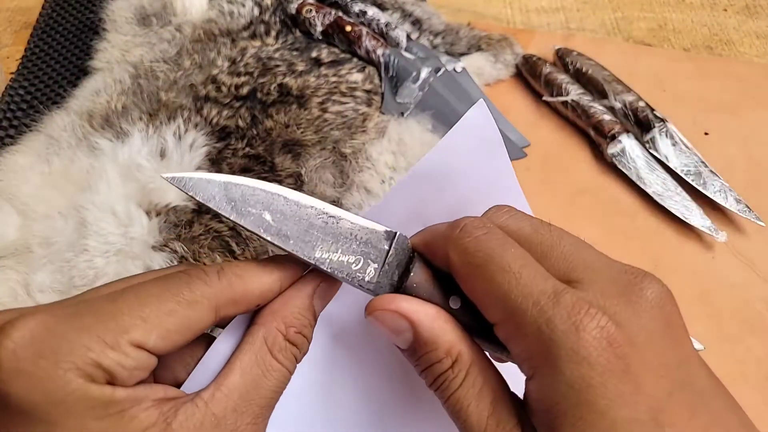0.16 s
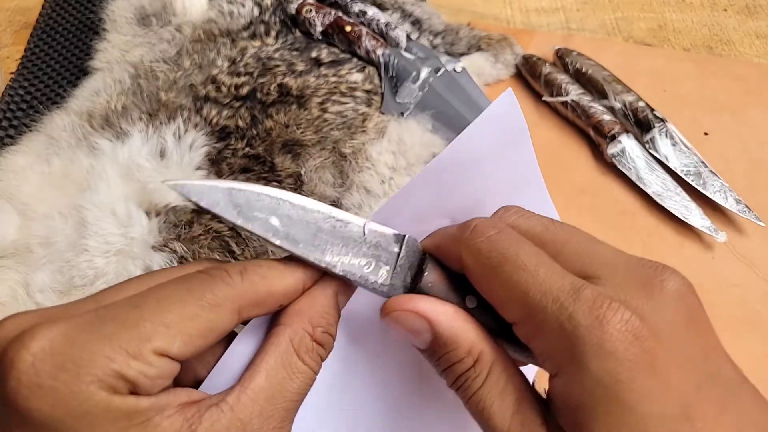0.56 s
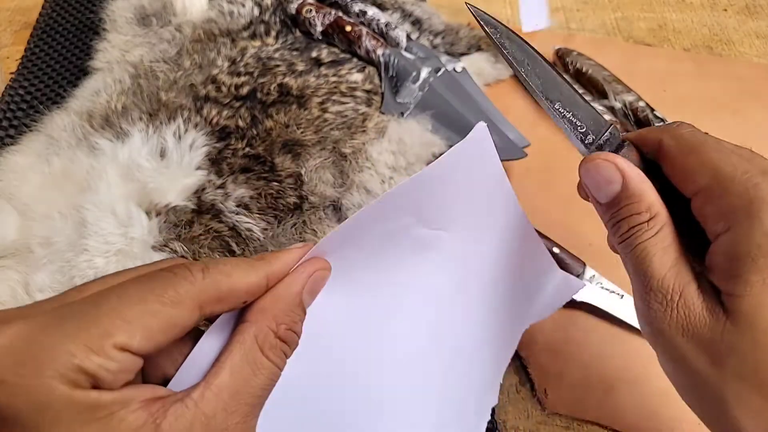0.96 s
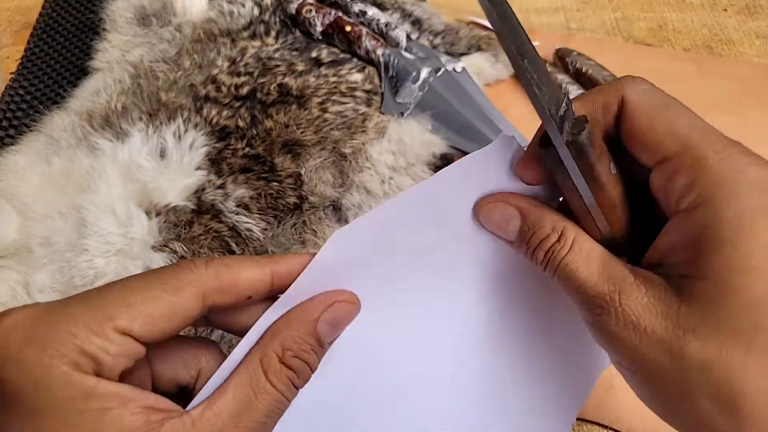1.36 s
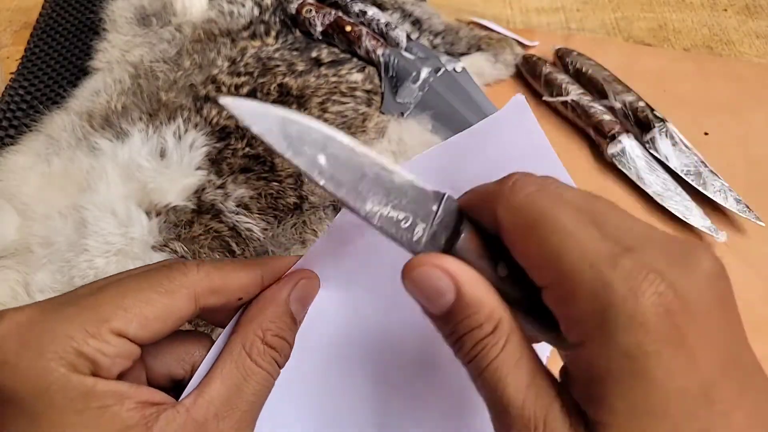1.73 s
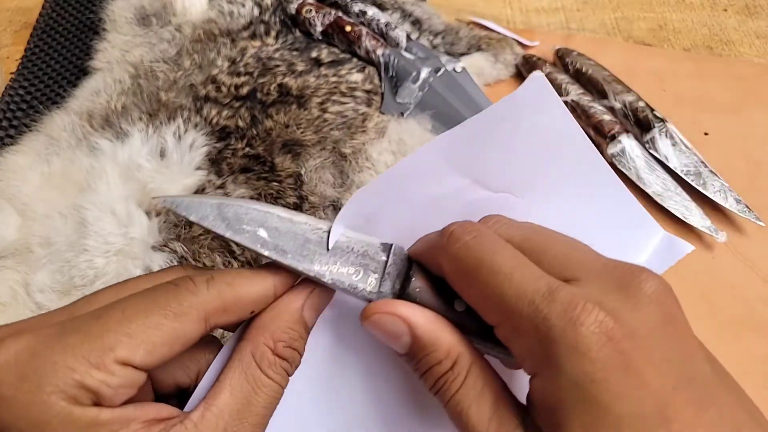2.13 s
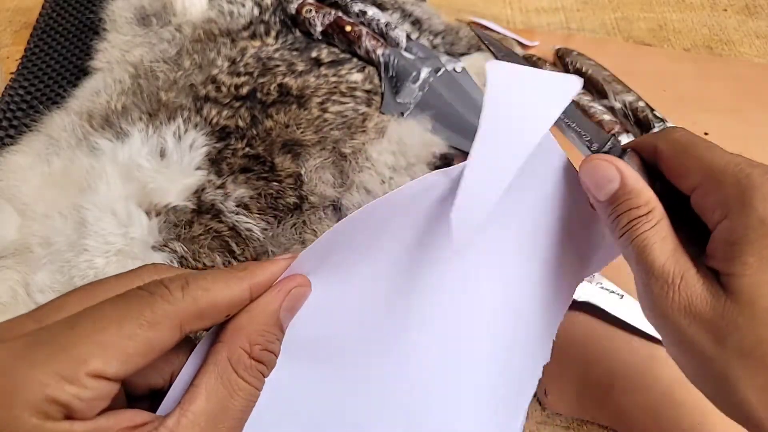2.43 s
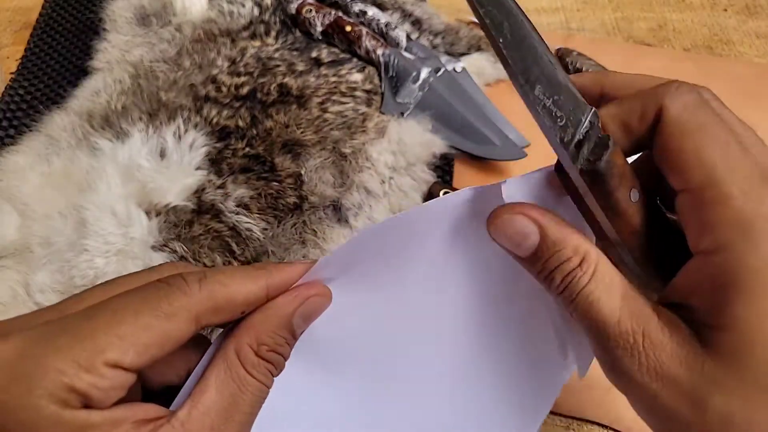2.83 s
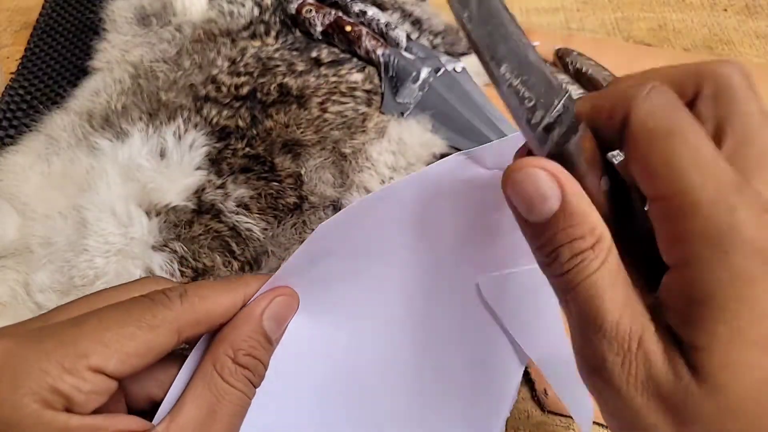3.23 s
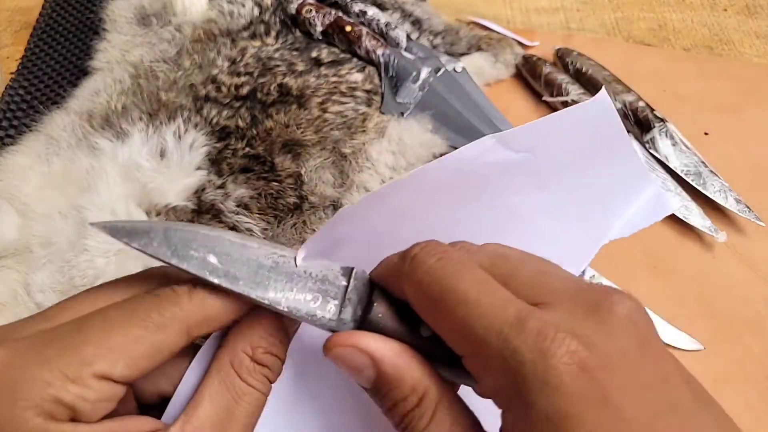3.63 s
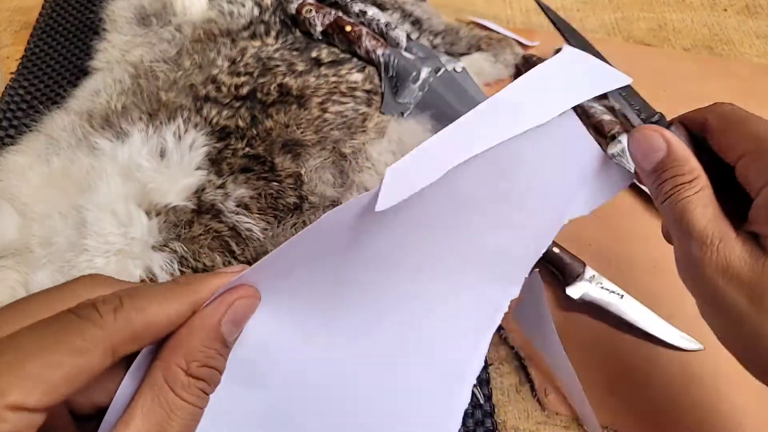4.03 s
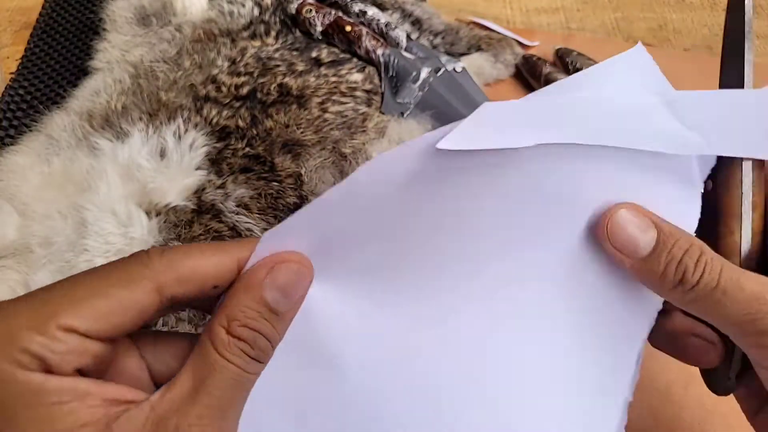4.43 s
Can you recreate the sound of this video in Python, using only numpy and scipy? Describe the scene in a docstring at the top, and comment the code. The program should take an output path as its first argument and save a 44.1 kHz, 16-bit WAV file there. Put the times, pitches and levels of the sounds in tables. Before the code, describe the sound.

Three short, hissing knife cuts through hand-held paper, close up, separated by soft finger rubs and crackles as the sheet buckles.

```python
"""Knife slicing paper

A sharp knife takes three slices off a hand-held sheet, close to a stereo microphone in a small room.
Fibres snap in a dense hiss, the edge catches and zips, and the first two strips flutter as they come free.
Between slices the fingers slide over the sheet and it buckles and snaps. A machine thrums far behind."""
import sys
import numpy as np
from scipy import signal
from scipy.fft import rfft, irfft, next_fast_len
from scipy.io import wavfile
from scipy.ndimage import uniform_filter1d, map_coordinates

SR = 44100
rng = np.random.default_rng(int(sys.argv[2]) if len(sys.argv) > 2 else 0)


def master(y):
    """Save y as 16-bit WAV."""
    cut = np.clip(np.atleast_2d(y).T, -1, 1)
    pcm = np.round(cut * 32767)  # scale
    wavfile.write(sys.argv[1], SR, pcm.astype(np.int16))


N = 201960

# The machine's drone. Each row: multiple of its beat, level in dB.
MACHINE_HARMONICS = [(3, -74.5), (4, -70), (5, -66.5), (6, -78.5), (11, -60.5), (13, -59), (15, -56.5),
                     (17, -58), (18, -59), (20, -60.5), (23, -56.5), (25, -60.5), (26, -57.5), (27, -61),
                     (28, -63.5)]
# Tone curves of the noise layers. Each row: frequency in Hz, relative level in dB.
RUMBLE_EQ = [(13, -44.5), (22, -12.5), (54, -0.5), (123, -14), (140, -5.5), (302, -5.5), (343, -3.5),
             (360, -14), (528, -9), (671, -17), (704, -16.5), (1000, -32.5), (1300, -55), (2200, -120)]
AIR_HISS_EQ = [(400, -21), (900, -5), (1700, -3), (2400, -9), (3600, -16), (5400, -13.5), (7400, -21),
               (9000, -29), (15500, -32)]
CRINKLE_EQ = [(400, 3), (900, 3), (1600, -2), (2600, -11), (6000, -17), (15000, -53)]
RUB_EQ = [(410, -29.5), (700, -5), (1200, -12), (1580, -7.5), (1940, -15.5), (2490, -10.5), (6830, -14),
          (9350, -17.5), (13000, -18.5), (16000, -24.5)]
PUFF_EQ = [(25, -22), (60, -2.5), (150, 5), (350, -1.5), (600, -23), (1500, -46)]
SHAKE_EQ = [(90, -18.5), (250, -4.5), (430, -9), (600, -6), (780, -2), (1000, 0), (1250, -22.5),
            (1700, -13.5), (3000, -57.5)]
SLICE_EQS = [
    [(650, -36.5), (1100, -7), (1270, -1), (1420, -7.5), (1650, -3.5), (2150, -3.5), (2520, -1), (4410, -2),
     (6910, -7), (10800, -4), (15100, 0), (16000, -7)],
    [(650, -30.5), (1100, -10), (1220, -6), (1700, -4), (2130, -7), (2440, -0.5), (3120, -2), (3570, -3.5),
     (6530, -9.5), (7550, -6), (8840, -9.5), (10800, -3.5), (15100, -4.5), (16000, -9.5)],
    [(650, -29), (1100, -8), (1270, -8.5), (1700, -1.5), (2130, -4), (2610, -1), (4720, -5.5), (5520, -4.5),
     (6390, -9), (9240, -12), (15100, -8.5), (16000, -20.5)],
]  # one curve a slice, as the sheet's free edge changes
# Stereo image of the background and of the paper. Each row: frequency in Hz, left-right likeness (1 is mono).
BACKGROUND_IMAGE = [(60, 0.86), (240, 0.84), (950, 0.0004), (3770, 0.0), (15000, -0.13)]
PAPER_IMAGE = [(300, 1), (700, .9), (1400, 0.78), (3000, 0.31), (14000, 0.35)]
# The small room's tail. Each row: frequency in Hz, seconds to fall 60 dB.
ROOM_DECAY = [(200, 0.19), (2000, 0.33), (12000, 0.26)]
# Colour difference of the microphones. Each row: frequency in Hz, left minus right in dB.
MIC_TILT = [(50, -0.9), (700, -0.1), (2500, 0.5), (5000, -1.1), (9000, 0.4), (15000, 3)]
# Crinkles as the grip shifts, and puffs of air. Each row: centre and half length in seconds, level in dB.
CRINKLES = [(0.196, 0.04, -54), (1.385, 0.015, -48), (1.45, 0.014, -57), (1.992, 0.0062, -54),
            (2.74, 0.024, -60.5), (3.3, 0.034, -56), (4.422, 0.038, -53)]
PUFFS = [(0.825, 0.0073, -40), (1.558, 0.0071, -42), (2.43, 0.033, -44.5), (2.472, 0.01, -34.5),
         (4.049, 0.0064, -34.5), (4.56, 0.021, -36)]
# Finger strokes. Each row: peak time, rise and fall in seconds, level in dB.
RUBS = [(1.385, 0.03, 0.012, -53), (1.45, 0.058, 0.075, -50.5), (1.6, 0.071, 0.017, -46.5),
        (2.03, .01, .012, -65), (2.72, 0.13, 0.13, -57.5), (3.02, 0.045, 0.057, -45.5),
        (3.169, .04, 0.032, -42), (3.3, 0.15, 0.077, -57.5), (4.36, 0.031, 0.1, -58.5),
        (4.554, 0.038, 0.11, -38)]
# The sheet buckles. Each row: start in seconds, pop level in dB, ring pitch in Hz, click level in dB,
# settling time in seconds.
SNAPS = [(0.874, -44, 900, -17.5, 0.0079), (1.0, -65, 1100, -42, 0), (1.549, -26, 604, -59, 0.021),
         (1.6, -35, 855, -41, 0), (2.471, -23.5, 810, -8, 0.009), (2.519, -24, 1045, -28, 0.01),
         (2.711, -34, 880, -34, 0), (2.961, -38.5, 1470, -34, 0), (3.0, -25.5, 990, -52, 0.01),
         (3.029, -29.5, 1250, -37, 0.0071), (3.175, -23.5, 760, -46, .028), (4.035, -28, 598, -28, 0),
         (4.048, -21.5, 897, -38, 0.004), (4.075, -34.5, 900, -20.5, 0.014), (4.526, -30, 753, -40, 0),
         (4.549, -24.5, 757, -27, 0.023)]
# Ring of a buckle. Each row: frequency and bandwidth as multiples of the ring pitch, level in dB.
SHEET_MODES = [(.48, .3, -3), (.74, .25, -2), (1.03, 0.21, 3), (1.65, 0.48, -4), (3, 1.33, -14.5)]
# A loose strip flutters. Each row: time of the widest flap in seconds, level in dB, pitch in Hz.
FLUTTERS = [(0.819, -15, 782), (2.459, -23.5, 687)]
# The edge catches. Each row: centre and half length in seconds, pitch in Hz, level in dB.
ZIPS = [(0.782, 0.009, 4380, -31), (0.817, 0.0065, 10360, -32), (2.337, .009, 7750, -26.5),
        (2.365, 0.017, 3040, -31.5), (2.444, 0.0087, 11000, -26.5), (3.81, 0.018, 4820, -30),
        (3.87, 0.011, 7740, -29.5), (3.939, 0.018, 3050, -28.5)]
# The edge bites harder or runs easier. Each row: centre and half length in seconds,
# change of hiss and change of sizzle in dB.
SURGES = [(0.645, 0.021, 2, -1), (0.81, 0.017, 1.5, 3.5), (2.293, 0.023, 2.5, 1.5), (2.336, 0.011, -1.5, 5),
          (2.392, .02, 0.5, -4.5), (2.444, .012, 1, 5), (3.753, 0.016, -1.5, -3.5), (3.79, 0.014, 1.5, 3.5),
          (3.89, 0.0091, -0.5, -2)]
# The cuts. Each row: blade in and blade out in seconds, hiss level in dB, sizzle against the hiss in dB,
# pressure sag in dB per second, extra shake at the far edge in dB.
SLICES = [(0.598, 0.832, -29, -2, 10, 15.5), (2.135, 2.466, -28.5, -2, 11, 11),
          (3.665, 4.029, -29, -1, 9.5, 1.5)]

MACHINE_BEAT_HZ, MAINS_HUM_HZ = 11.855, 100
SETTLE_GAP_S, SETTLE_LOSS_DB = 0.008, 5  # after-snaps: spacing, and loss over the settling time
FLAP_GAP_S, FLAP_SWELL_DB_PER_S, FLAP_FADE_DB_PER_S = 0.0135, 259.5, 229
BITE_S, BITE_POWER, RELEASE_DB_PER_S = 0.14, 1.3, 333.5  # attack and release of the blade's pressure
SIZZLE_POWER = 1.54  # the sizzle follows the pressure more steeply than the hiss
SHAKE_DB, LOOSE_S = -13, 0.063  # sheet shake against the hiss; how quickly the strip loosens
TOP_HZ = 15900


def amp(db):
    """Decibels to gain."""
    return 10 ** (np.asarray(db) / 20)


def unit(x):
    """Scale to an rms of 1."""
    return x / np.sqrt(np.mean(x ** 2) + 1e-20)


def along(points, hz):
    """Read a curve of (Hz, value) points on a log frequency axis."""
    f, v = np.transpose(points)
    return np.interp(np.log(hz + 1), np.log(f + 1), v)


def clock():
    """Time of every sample in seconds."""
    return np.arange(N) / SR


def wobble(rate):
    """Smooth random modulation with rate knots a second."""
    return map_coordinates(rng.standard_normal(int(N * rate / SR) + 4), [clock() * rate])


def bell(centre, half_length):
    """A bell-shaped envelope that peaks at 1."""
    return np.exp(-((clock() - centre) / half_length) ** 2 / 2)


def swells(rows):
    """One envelope made of bells, each at its own level."""
    return sum(amp(db) * bell(centre, half_length) for centre, half_length, db in rows)


def add(track, start, sound):
    """Mix a short sound in at start seconds."""
    part = track[..., max(round(start * SR), 0):][..., :sound.shape[-1]]
    part += sound[..., :part.shape[-1]]


def filtered(x, response):
    """Filter x with a complex frequency response."""
    size = next_fast_len(N + SR // 2)
    return irfft(rfft(x, size) * response(np.fft.rfftfreq(size, 1 / SR)), size)[..., :N]


def coloured(x, eq):
    """Shape x with a tone curve and bring it to an rms of 1."""
    return unit(filtered(x, lambda f: amp(along(eq, f))))


def resonance(f, hz, width):
    """Band-pass response of one ringing mode."""
    return 1j * f * width / (hz * hz - f * f + 1j * f * width)


def spread(pair, image, lag):
    """Blend two unrelated signals into a stereo image; the right lags by lag seconds."""
    angle = lambda f: np.arccos(np.clip(along(image, f), -1, 1)) / 2
    mid, side = filtered(pair, lambda f: np.array([np.cos(angle(f)), np.sin(angle(f))]))
    left_right = np.array([mid + side, mid - side])
    return filtered(left_right, lambda f: np.exp(1j * np.pi * f * lag * np.array([[1], [-1]])))


def background():
    """The bed: a machine's slightly unsteady harmonics, mains hum, pulsing rumble and faint hiss."""
    t = clock()
    beat = 2 * np.pi * MACHINE_BEAT_HZ * t
    thrum = np.zeros(N)
    for multiple, db in MACHINE_HARMONICS:
        gain = amp(db + 0.6 * wobble(2.4))
        thrum += gain * np.cos(multiple * beat + 2 * np.pi * rng.random() + 0.45 * wobble(2.977))
    hum = amp(-61.5) * np.sin(2 * np.pi * MAINS_HUM_HZ * t)
    air = spread(rng.standard_normal((2, N)), BACKGROUND_IMAGE, lag=-0.00014)
    rumble = coloured(air, RUMBLE_EQ) * amp(0.62 * np.sin(2 * beat))
    hiss = coloured(air, AIR_HISS_EQ)
    return np.sqrt(2) * (thrum + hum) + amp(-48.5) * rumble + amp(-64.5) * hiss


def room(x):
    """A short reverb in which each frequency dies at its own speed."""
    hz, t, spectrum = signal.stft(rng.standard_normal((2, SR // 2)), SR, nperseg=256)
    decay = amp(-60 * t / along(ROOM_DECAY, hz)[:, None])
    tail = signal.istft(spectrum * decay, SR, nperseg=256)[1]
    return signal.fftconvolve(x, tail / np.linalg.norm(tail[0]), axes=1)[:, :N]


def fibres(rate, scatter_db, patchy_db, lag):
    """Paper grain: rate tiny snaps a second, their colour and direction shifting as the sheet bends."""
    def patches():
        noise = rng.standard_normal(spectrum.shape[1:])
        return unit(uniform_filter1d(uniform_filter1d(noise, size=4, axis=0), size=4, axis=1))

    sizes = amp(scatter_db * rng.standard_normal((2, N))) * np.sign(rng.standard_normal((2, N)))
    ticks = spread((rng.random((2, N)) < rate / SR) * sizes, PAPER_IMAGE, lag)
    hz, _, spectrum = signal.stft(ticks, SR, nperseg=1024)
    swirl = 0.96 * patches() * np.minimum(hz / 3000, 1)[:, None]  # short waves feel the bends most
    spectrum = spectrum * amp(patchy_db * patches()) * np.exp(0.5j * np.array([swirl, -swirl]))
    return signal.istft(spectrum, nperseg=1024)[1][:, :N]


def crinkles():
    """The bending sheet gives clusters of sparse, soft ticks."""
    ticks = fibres(rate=440, scatter_db=4.5, patchy_db=6.5, lag=0)
    return swells(CRINKLES) * coloured(ticks, CRINKLE_EQ)


def finger_rubs():
    """Dry fingertips brush the sheet in pointed strokes as they change grip."""
    t = clock()
    grain = fibres(rate=3500, scatter_db=2.5, patchy_db=3.0, lag=0.00007)
    brush = coloured(grain, RUB_EQ) * amp(1.8 * wobble(150))
    strokes = [amp(db) * np.exp(-np.maximum((peak - t) / rise, (t - peak) / fall) ** 1.1)
               for peak, rise, fall, db in RUBS]
    return brush * np.linalg.norm(strokes, axis=0)


def air_puffs():
    """The swinging sheet fans low gusts at both microphones."""
    return swells(PUFFS) * coloured(rng.standard_normal(N), PUFF_EQ)


def buckles():
    """Cue each snap, then the weaker after-snaps with which the sheet settles."""
    for start, pop_db, hz, click_db, settling in SNAPS:
        yield start, pop_db, hz, click_db
        delays = np.arange(SETTLE_GAP_S, settling, SETTLE_GAP_S)
        for delay, (late, detune) in zip(delays, rng.standard_normal((8, 2))):
            onset = start + delay + 0.0012 * late
            loss_db = SETTLE_LOSS_DB * delay / settling
            yield onset, pop_db - loss_db, hz * np.exp(0.1 * detune), min(click_db, pop_db) - loss_db


def sheet_snaps():
    """Each buckle is a bright click over a pop: a short crumple that rings the sheet."""
    out, t = np.zeros((2, N)), np.arange(SR // 10) / SR
    f = np.fft.rfftfreq(len(t), 1 / SR)
    bright = resonance(f, hz=5500, width=6500)
    for start, pop_db, hz, click_db in buckles():
        crumple = rng.standard_normal((2, len(t))) * amp(-60 * t / 0.032) * (1 - np.exp(-t / 0.00014))
        click = 0.068 * crumple
        click[0, 0] = 1  # a hard transient in the centre of the image
        ring = sum((-1) ** k * amp(db) * resonance(f, hz * ratio, hz * width)
                   for k, (ratio, width, db) in enumerate(SHEET_MODES))
        for push, response, db in (crumple, ring, pop_db), (click, bright, click_db):
            sound = irfft(rfft(push) * response)[:, :len(t) // 2]
            add(out, start, amp(db) * sound / np.abs(sound).max())
    return spread(out, PAPER_IMAGE, lag=0.00003)


def strip_flutter():
    """The strip flaps at a nearly even pace, swelling until it comes free; each flap rings briefly."""
    out, t = np.zeros(N), np.arange(SR // 20) / SR
    envelope = (1 - np.exp(-t / 0.00097)) * amp(-60 * t / 0.032)
    flaps = np.arange(-5, 3)  # flap 0 is the widest
    for widest, db, hz in FLUTTERS:
        for flap, (detune, late) in zip(flaps, rng.standard_normal((len(flaps), 2))):
            offset = FLAP_GAP_S * flap * (1 + 0.03 * late)
            loss_db = max(-FLAP_SWELL_DB_PER_S * offset, FLAP_FADE_DB_PER_S * offset)
            swing = np.sin(2 * np.pi * hz * (1 + 0.071 * detune) * t)
            add(out, widest + offset, amp(db - loss_db) * swing * envelope)
    return out


def edge_zips():
    """A narrow band of noise zips out each time the fibres briefly give way."""
    out = np.zeros((2, N))
    for centre, half_length, hz, db in ZIPS:
        band = unit(filtered(rng.standard_normal((2, N)), lambda f: resonance(f, hz, width=1200) ** 2))
        out += amp(db) * band * bell(centre, half_length)
    return out


def blade_pressure(enters, leaves, sag):
    """Envelope of a cut: the edge bites in, eases slowly along the way and lets go."""
    t = clock()
    bite = np.clip((t - enters) / BITE_S, 0, 1) ** BITE_POWER
    sag_db = sag * np.maximum(t - enters - BITE_S, 0)
    release_db = RELEASE_DB_PER_S * np.maximum(t - leaves, 0)
    return bite * amp(-sag_db - release_db)


def knife_slices():
    """The edge severs thousands of fibres a second; their tugs shake the sheet as the strip loosens."""
    out = np.zeros((2, N))
    low_share = lambda f: 1 / (1 + (f / 6500) ** 8)  # crossover: hiss below, sizzle above
    surges_db = sum(np.outer(changes, bell(centre, half)) for centre, half, *changes in SURGES)
    hiss_surge, sizzle_surge = amp(surges_db)
    for (enters, leaves, db, sizzle_db, sag, loose_db), eq in zip(SLICES, SLICE_EQS):
        pressure = blade_pressure(enters, leaves, sag)
        looseness = np.exp(-np.abs(clock() - leaves) / LOOSE_S)
        tugs = fibres(rate=7500, scatter_db=2.5, patchy_db=3.0, lag=0.0001)
        hiss = unit(filtered(tugs, lambda f: amp(along(eq, f)) * np.sqrt(low_share(f))))
        sizzle = unit(filtered(tugs, lambda f: amp(along(eq, f)) * np.sqrt(1 - low_share(f))))
        shake = coloured(tugs, SHAKE_EQ) * amp(SHAKE_DB + loose_db * looseness)
        body = pressure * (hiss * hiss_surge + shake)
        top = pressure ** SIZZLE_POWER * sizzle * sizzle_surge * amp(sizzle_db)
        drag = amp(0.95 * wobble(200))  # the blade advances unevenly
        out += amp(db) * drag * (body + top)
    return out


def scene():
    """The mix: paper up close, a touch of room, the machine bed underneath."""
    cutting = knife_slices() + edge_zips() + strip_flutter()
    paper = cutting + air_puffs() + finger_rubs() + crinkles() + sheet_snaps()
    return paper + amp(-13) * room(paper) + background()


def record(dry):
    """The two microphones differ a little in colour; a steep high cut closes the top."""
    tilt = lambda f: amp(along(MIC_TILT, f) * np.array([[0.5], [-0.5]]))
    high_cut = lambda f: 1 / (1 + (f / TOP_HZ) ** 200)
    return filtered(dry, lambda f: tilt(f) * high_cut(f))


dry = scene()
out = record(dry)
master(out)
```